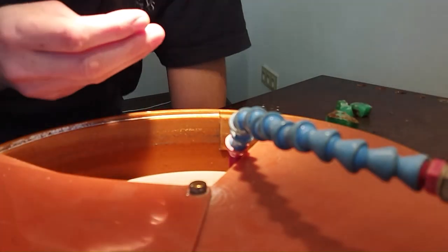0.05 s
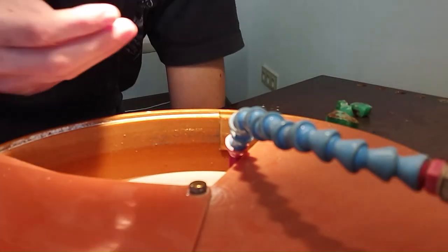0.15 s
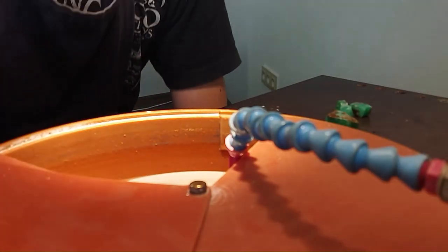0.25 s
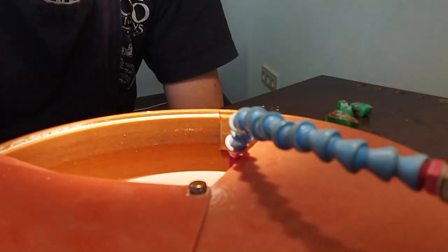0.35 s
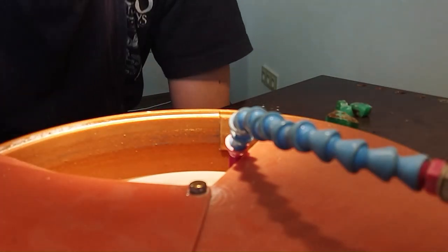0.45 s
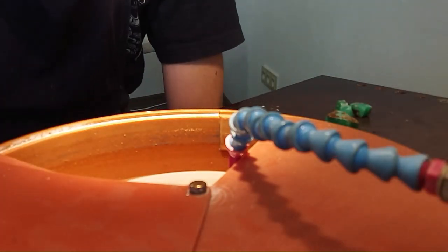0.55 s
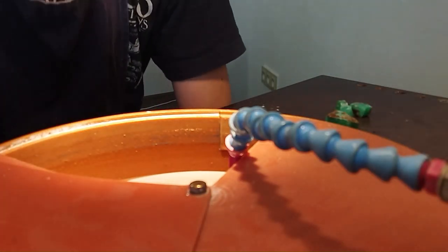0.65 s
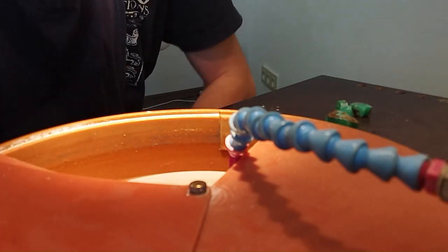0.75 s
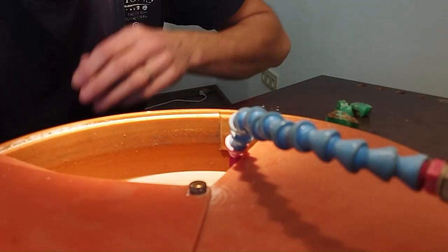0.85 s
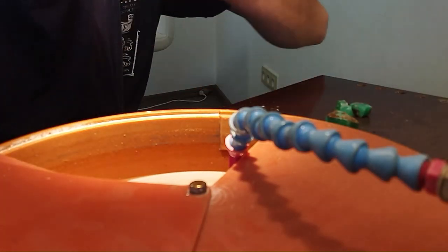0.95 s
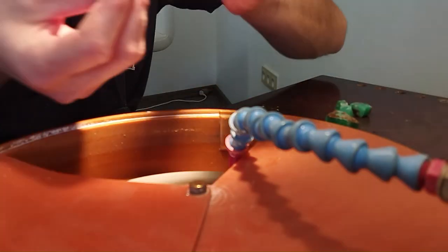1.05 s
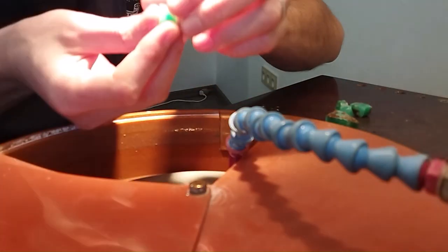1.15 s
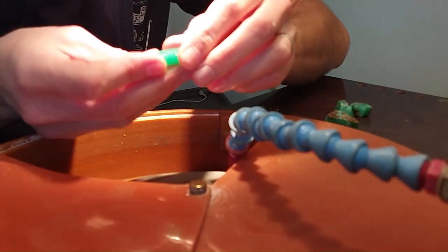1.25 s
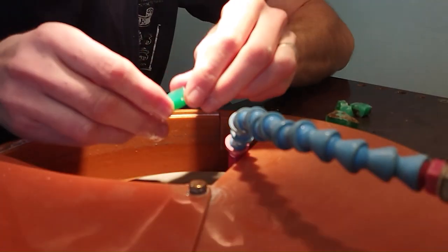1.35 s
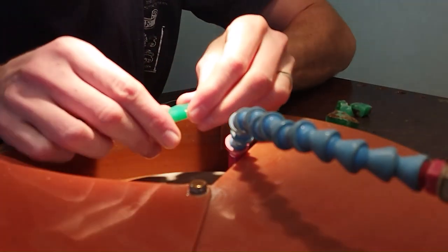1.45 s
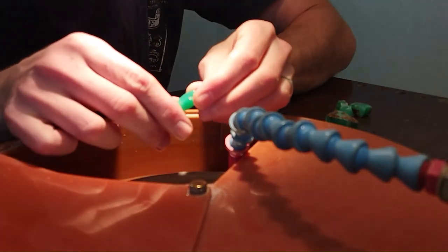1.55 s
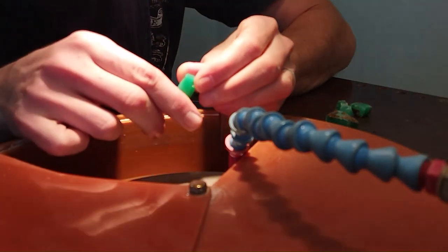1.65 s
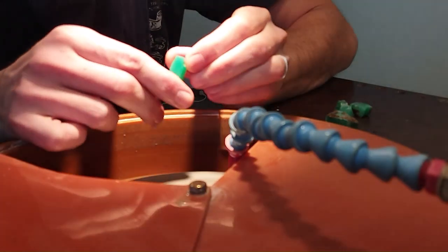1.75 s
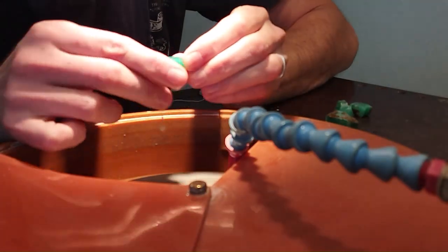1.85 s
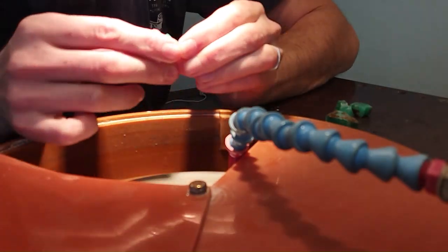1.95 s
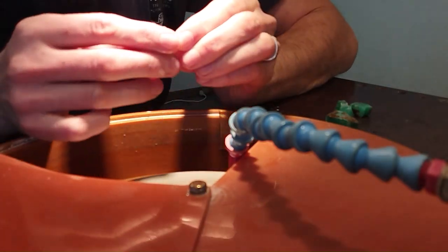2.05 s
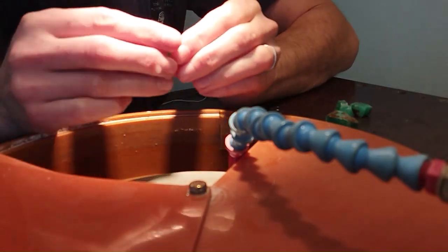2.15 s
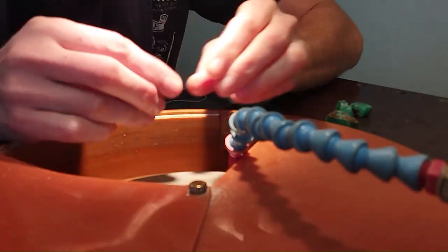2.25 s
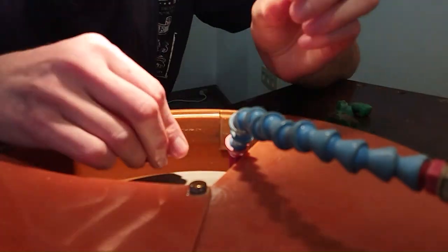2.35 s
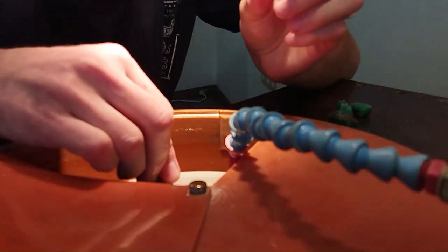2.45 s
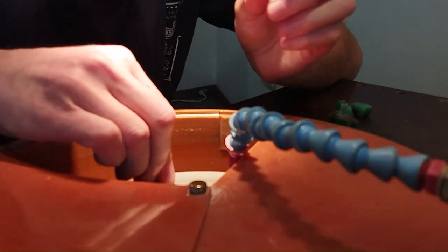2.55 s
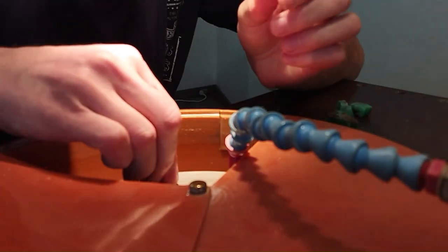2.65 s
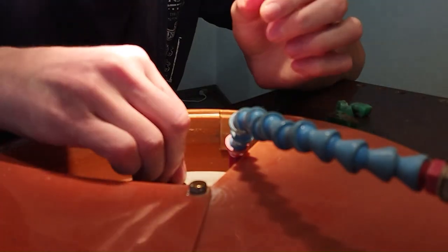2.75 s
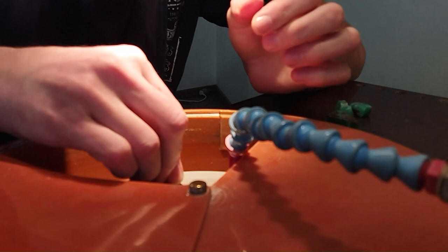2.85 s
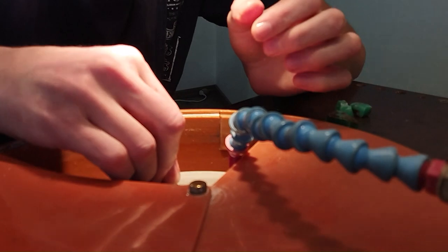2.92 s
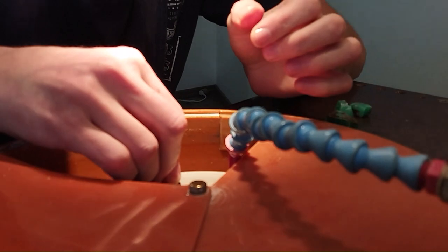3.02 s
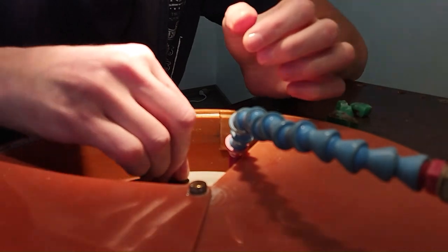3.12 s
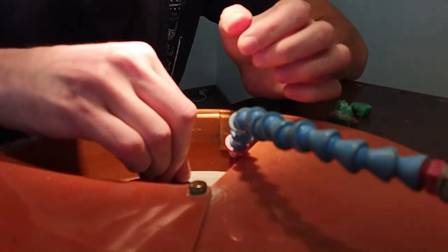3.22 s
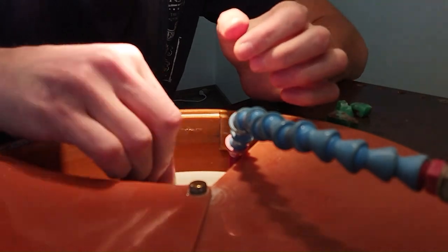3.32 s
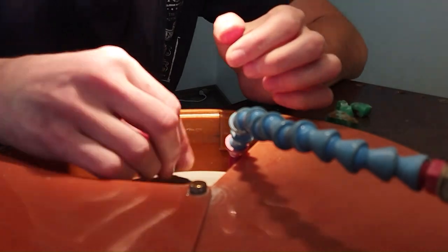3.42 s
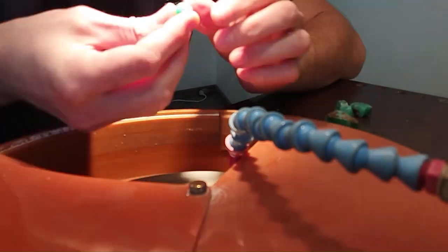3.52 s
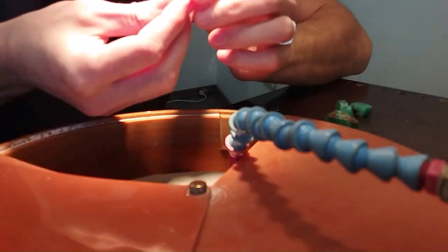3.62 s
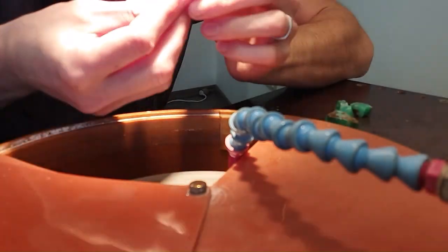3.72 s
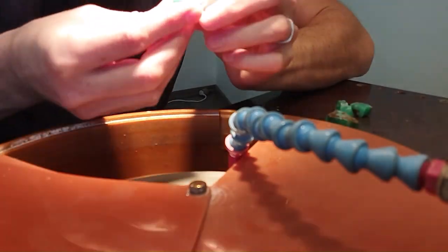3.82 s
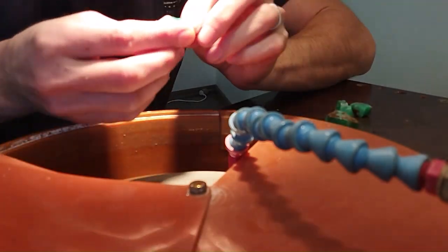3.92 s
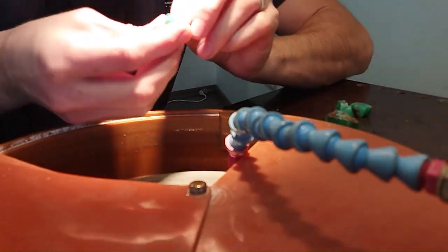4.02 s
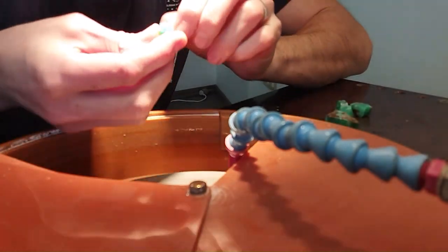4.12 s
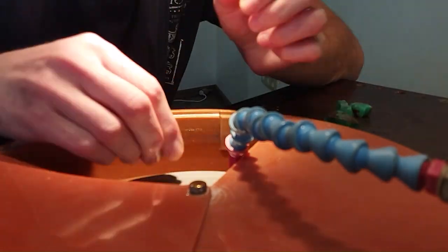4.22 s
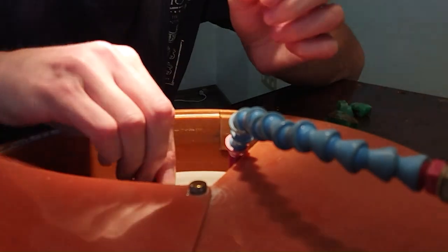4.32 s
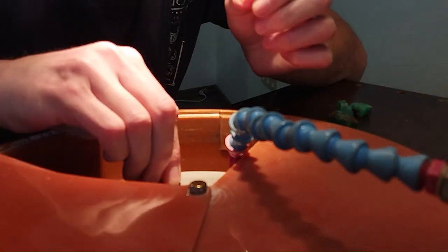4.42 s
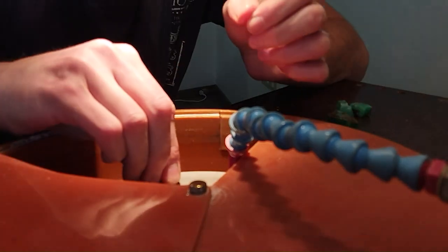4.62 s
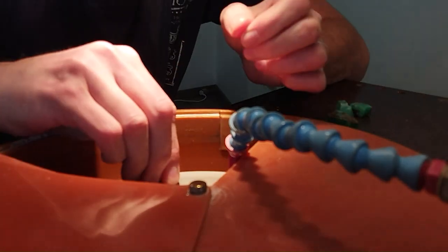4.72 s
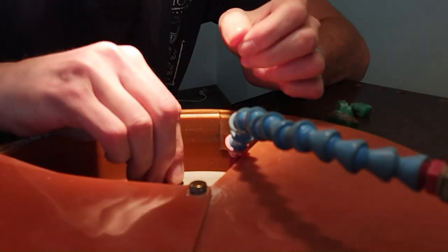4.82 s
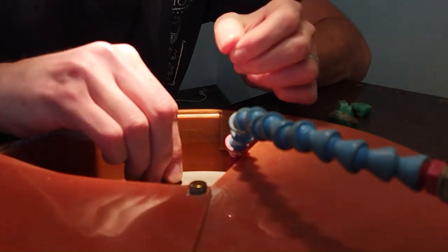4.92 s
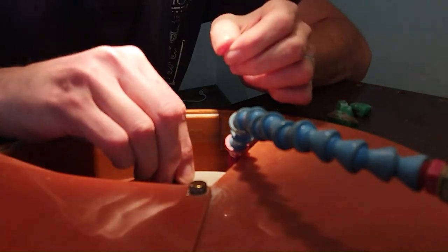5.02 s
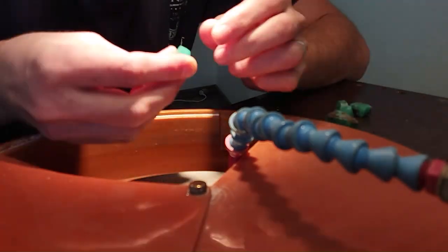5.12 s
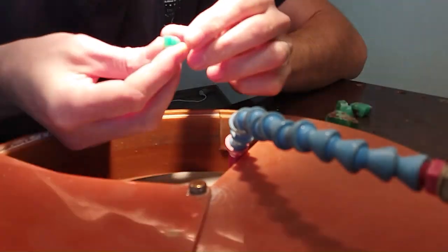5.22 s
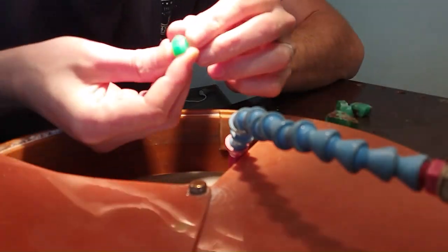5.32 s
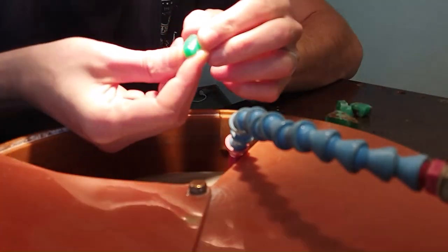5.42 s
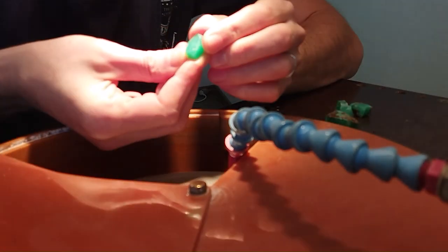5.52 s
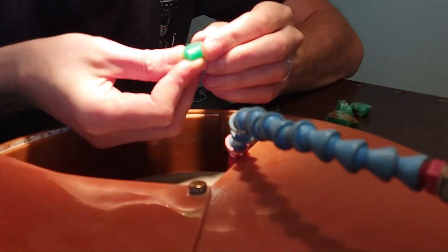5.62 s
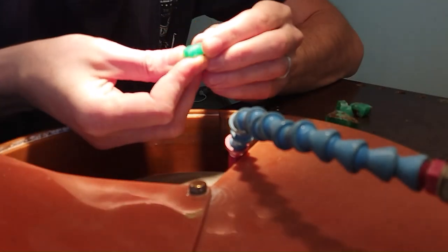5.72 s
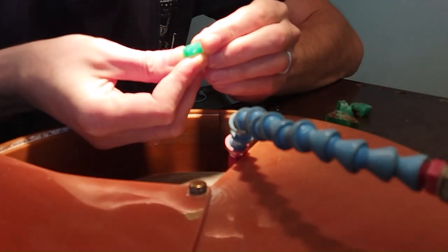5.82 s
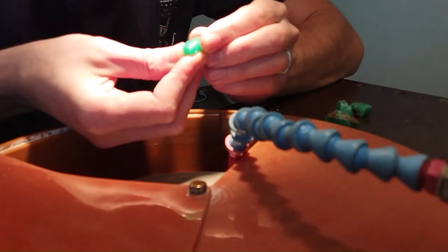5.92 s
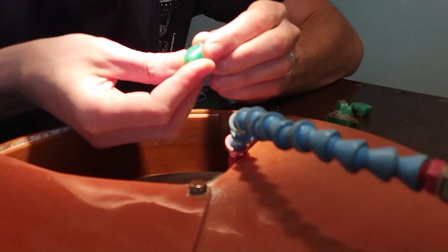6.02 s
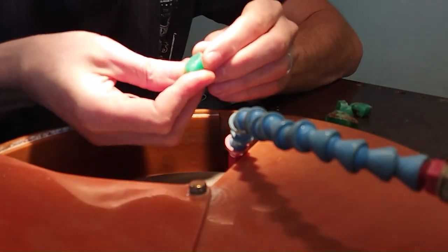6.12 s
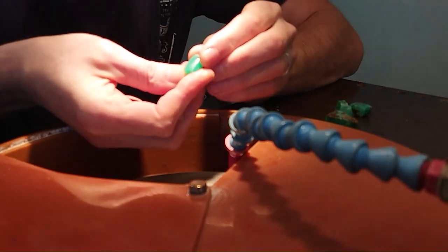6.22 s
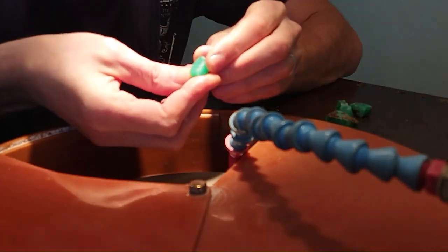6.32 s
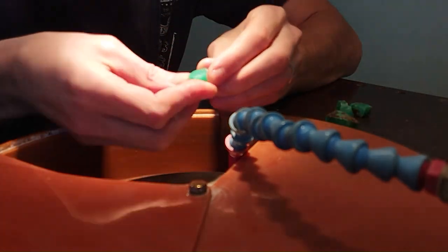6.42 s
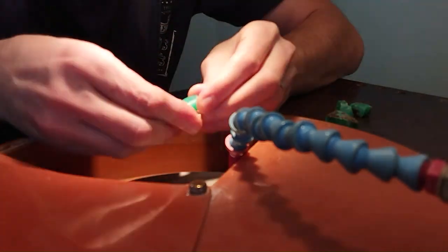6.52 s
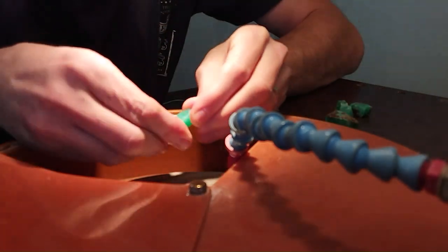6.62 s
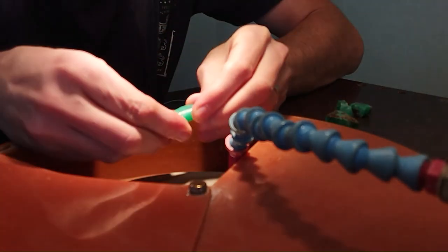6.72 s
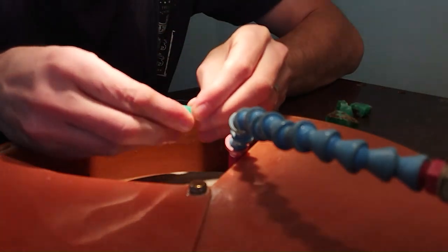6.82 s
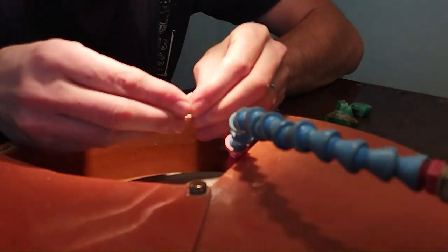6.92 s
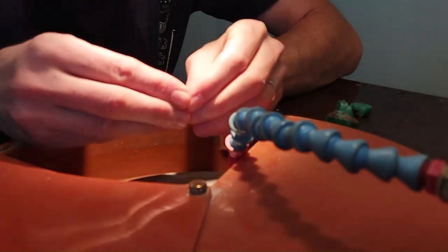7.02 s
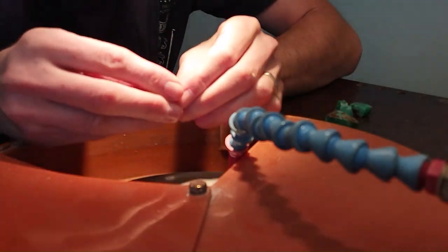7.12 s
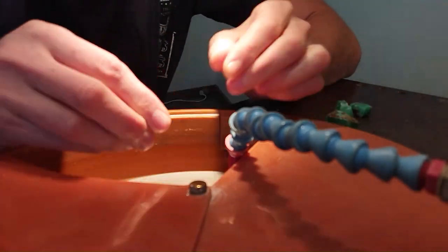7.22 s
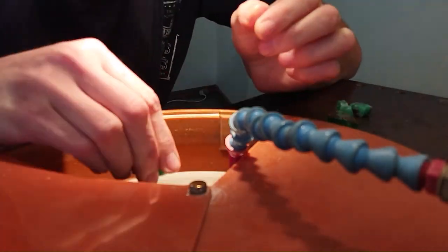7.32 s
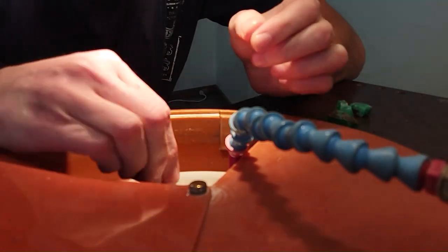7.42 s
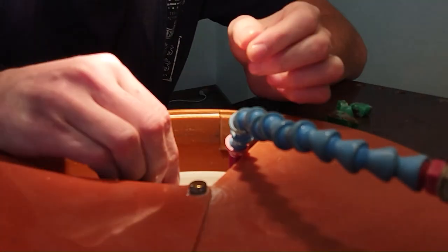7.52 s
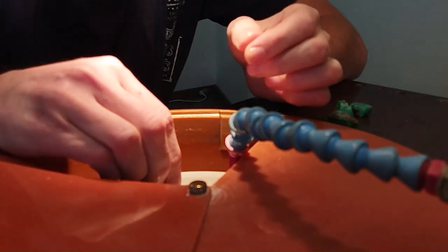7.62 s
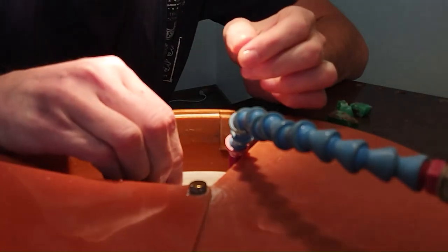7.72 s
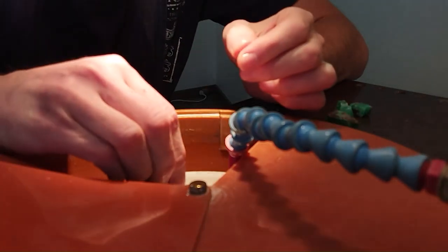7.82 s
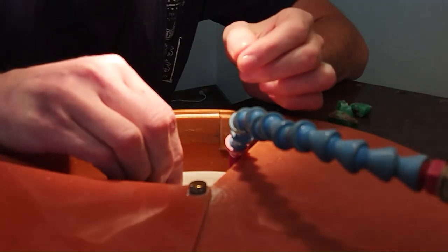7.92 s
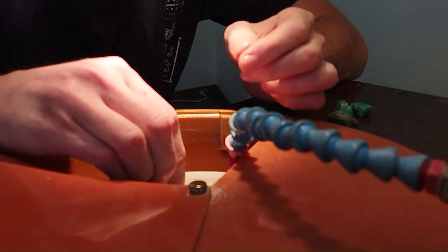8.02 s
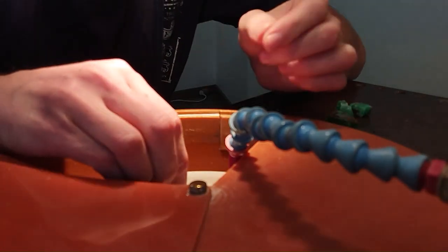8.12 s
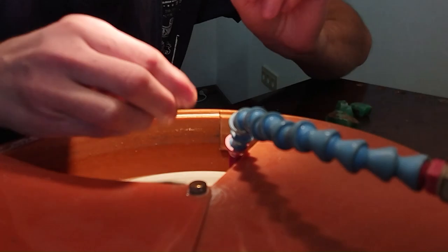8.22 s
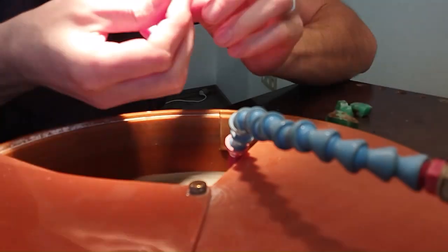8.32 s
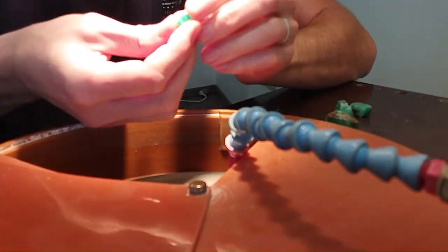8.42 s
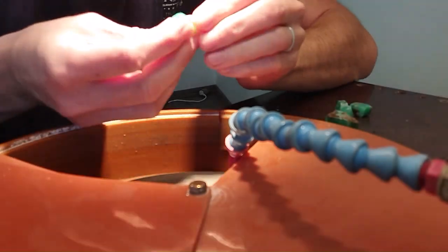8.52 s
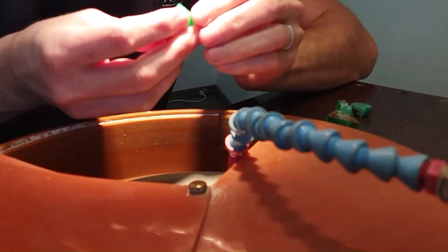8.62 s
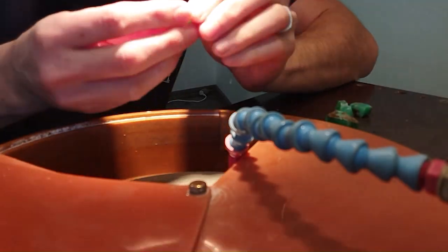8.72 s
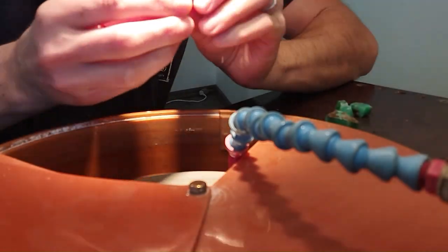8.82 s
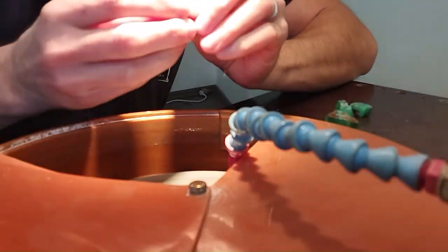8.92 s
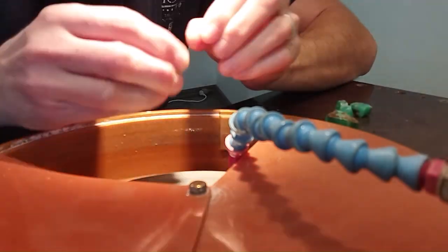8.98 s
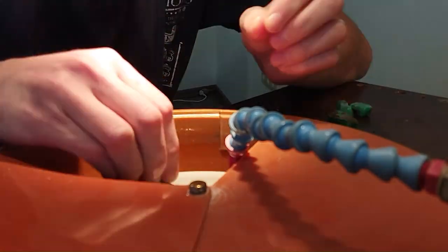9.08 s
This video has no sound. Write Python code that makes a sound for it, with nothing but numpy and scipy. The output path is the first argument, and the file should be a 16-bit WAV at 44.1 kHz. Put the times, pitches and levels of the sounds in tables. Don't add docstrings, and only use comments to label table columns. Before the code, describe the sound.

Steady motor hum, thin whine and water spray, one dull double knock, then three harsh gritty hisses as a stone meets a spinning disc.

```python
import sys
import numpy as np
from scipy import signal
from scipy.fft import rfft, irfft, next_fast_len
from scipy.io import wavfile
from scipy.ndimage import uniform_filter1d, map_coordinates

SR = 44100
rng = np.random.default_rng(int(sys.argv[2]) if len(sys.argv) > 2 else 0)


def persist_wave(psi):
    counts = np.round(np.clip(psi, -1, 1) * 32767).astype(np.int16)
    wavfile.write(sys.argv[1], SR, np.atleast_2d(counts).T)


def elevation(decibels):
    levels = np.asarray(decibels, float)
    return 10 ** (levels / 20)


N = 403515

HOP = 256
FRAMES = N // HOP + 5
HZ = np.fft.rfftfreq(4 * HOP, 1 / SR)
T, TF = np.arange(N) / SR, np.arange(FRAMES) * HOP / SR
SIDES = np.array([[.5], [-.5]])


def evened(x):
    return x / np.sqrt(np.mean(np.abs(x) ** 2) + 1e-20)


def read(points, hz):
    f, value = np.transpose(points)
    return np.interp(np.log(hz + 1), np.log(f + 1), value)


def columns(rows, t):
    s, *values = np.transpose(rows)
    return [np.interp(t, s, v) for v in values]


def humps(modes):
    return sum(db / (1 + (2 * (HZ - hz) / w) ** 2) for hz, w, db in modes)


def drift(t, top_hz):
    rates = np.geomspace(.3, top_hz, num=24)
    coarse = np.arange(0, N / SR + .02, .005)
    phases = 2 * np.pi * (np.outer(coarse, rates) + rng.random(len(rates)))
    waves = np.sin(phases) / rates ** 0.36
    return np.interp(t, coarse, evened(waves.sum(axis=1)))


def pair(same):
    a, b = rng.standard_normal((2, N))
    same = np.clip(same, -1, 1)
    return np.array([a, same * a + np.sqrt(1 - same ** 2) * b])


def resonate(x, hz, width):
    turn = np.exp(2j * np.pi * np.cumsum(hz * np.ones(N)) / SR)
    r = np.exp(-np.pi * width / SR)
    return 2 * (turn * signal.lfilter([1 - r], [1, -r], x * turn.conj())).real


def hiss(colour_db, same, lean, patchy_db, flicker_db, turn=0):
    a, b, c, d, patches = rng.standard_normal((FRAMES, len(HZ), 5)).T
    patches = uniform_filter1d(patches, size=8, axis=0)
    patches = evened(uniform_filter1d(patches, size=10, axis=1))
    flicker = evened(uniform_filter1d(rng.standard_normal(FRAMES), size=2))
    alike = np.clip(read(same, HZ), -1, 1)[:, None]
    left = a + 1j * b
    right = alike * left * np.exp(1j * turn) + np.sqrt(1 - alike ** 2) * (c + 1j * d)
    z = np.array([left, right])
    z *= elevation(SIDES * read(lean, HZ))[:, :, None]
    z *= elevation(colour_db + patchy_db * patches + flicker_db * flicker)
    return evened(signal.istft(z, nperseg=4 * HOP, noverlap=3 * HOP)[1][:, :N])


# [f/Hz, level/dB per Hz]
WASH_COLOUR = [(35, -86), (60, -63), (188, -39), (221, -28), (261, -14.5), (416, -21), (837, -10),
               (1190, -12), (1650, -2), (2180, -13), (2810, -3.5), (4280, -10), (4810, -8.5), (5530, -8.5),
               (15800, -21)]
# [f/Hz, width/Hz, level/dB]
PAN_DIPS = [(446, 71, -2.5), (1080, 280, -4), (4355, 190, -7.5), (5710, 290, -12.5), (6540, 470, -6),
            (8840, 410, -4), (11280, 700, -3.5), (14700, 1200, -3), (15440, 1200, 5.5)]
# [f/Hz, likeness -1 to 1]
SPRAY_SAME = [(100, 0.8), (290, 0.72), (900, -0.025), (1500, 0.21), (2200, 0.3), (3200, -0.69),
              (4500, -0.097), (15000, 0.083)]
# [f/Hz, left over right level/dB]
SPRAY_LEAN = [(60, 4), (180, 5.5), (550, 0), (1650, -2), (4970, 0), (15000, 3)]


def spray(speed, drone_db):
    spray_db = 0.7 * drift(TF, top_hz=5.5)
    treble = np.clip(np.log2(HZ / 2500 + .01), 0, 1)[:, None]
    colour_db = (read(WASH_COLOUR, HZ) + humps(PAN_DIPS))[:, None]
    colour_db = colour_db + treble * spray_db + (1 - treble) * 0.31 * drone_db
    shaft_hz = 32.6
    turn = 2 * np.pi * np.cumsum(shaft_hz * speed) / SR
    throb = 1 + 0.12 * np.cos(turn) + 0.069 * np.cos(2 * turn + 0.94)
    return elevation(-32.5) * hiss(colour_db, SPRAY_SAME, SPRAY_LEAN, patchy_db=.7, flicker_db=.35) * throb


# [f/Hz, width/Hz, level/dB]
MOTOR_TONES = [(198.8, 4.3, -65.5), (265.2, 8.3, -58), (317.8, 15, -57.5), (663, 8.3, -57), (816, 10, -53),
               (882, 5, -57), (918, 8.3, -62), (1286, 46, -75), (1425, 10, -70.5), (1462, 6.7, -45.5),
               (1497, 18, -46.5), (1612, 7.3, -45.5), (1620, 12, -49), (1770, 5.3, -55.5),
               (2550, 11, -59.5), (2746, 12, -50), (3037, 7.8, -53), (3115, 26, -49.5), (3616, 25, -50.5)]


def fuzzy_tones(speed):
    size = next_fast_len(N + SR // 2)
    f = np.fft.rfftfreq(size, 1 / SR)
    power = sum(elevation(2 * db) * w * SR / (4 * np.pi) / ((f - hz) ** 2 + w ** 2 / 4) for hz, w, db in MOTOR_TONES)
    steady = irfft(rfft(pair(same=0.86), size) * np.sqrt(power * size / N), size)
    return np.array([map_coordinates(ear, [np.cumsum(speed)], order=3) for ear in steady])


def whine(whine_hz):
    peak_hz, width_hz, lift_db = 4708, 45, 11
    whine_db = -60 + lift_db / (1 + (2 * (whine_hz - peak_hz) / width_hz) ** 2)
    waver_hz = 3.0 * evened(uniform_filter1d(rng.standard_normal(N), size=3000))
    phase = 2 * np.pi * np.cumsum(whine_hz + waver_hz) / SR + np.array([[0], [1.2]])
    sideband_hz = 182
    lines = np.cos(phase) + elevation(-6) * np.cos(phase + 2 * np.pi * sideband_hz * T)
    return elevation(whine_db + 9.0) * lines


# [t/s, f/Hz]
WHINE_PITCH = [(0, 4772), (2.4, 4778), (3.6, 4782), (4.3, 4758), (5.2, 4712), (6.7, 4705), (6.78, 4686),
               (7.1, 4673), (7.45, 4686), (8.3, 4682), (8.55, 4660), (8.75, 4680), (8.88, 4710),
               (9.15, 4704)]


def motor():
    whine_hz, = columns(WHINE_PITCH, T)
    speed = whine_hz / 4706
    rise_db_per_s, swell_db = 0.15, 2.26
    drone_db = rise_db_per_s * (TF - TF.mean()) + swell_db * drift(TF, top_hz=9)
    drone = fuzzy_tones(speed) * elevation(np.interp(T, TF, drone_db)) * elevation([[-1.2], [1.2]])
    return spray(speed, drone_db) + drone + whine(whine_hz)


# [f/Hz, level/dB, t60/s]
BENCH_MODES = [(125, -13.5, 0.22), (256, -10, 0.19), (337, -13, 0.13), (385, -5, 0.11), (541, -4.5, 0.19),
               (619, -3, 0.15), (685, 4.5, 0.078), (880, -9, 0.088), (1050, -5, 0.038)]
# [t/s, peak level/dB, pitch factor]
KNOCKS = [
    (.621, -22.5, 1),
    (.648, -26, .91),
    (.712, -32, .85),
]


def knocks():
    out, t = np.zeros(N), np.arange(SR // 2) / SR
    for s, db, pitch in KNOCKS:
        ring = sum(elevation(d - 60 * t / t60) * np.sin(2 * np.pi * hz * pitch * t) for hz, d, t60 in BENCH_MODES)
        ring *= 1 - np.exp(-t / 0.0086)
        out[round(s * SR):][:len(t)] += elevation(db) * ring / np.abs(ring).max()
    return np.array([out, out])


LIFT_DB_PER_S = 190


def stroke(t, touch, lift):
    bite_s, settle_s = 0.00054, 0.036
    since = t - touch
    contact = np.clip(since / bite_s, 0, 1)
    fresh = np.exp(-np.maximum(since, 0) / settle_s)
    return contact, fresh, np.maximum(t - lift, 0)


# [pan ring at touch level/dB, pan ring held level/dB, judder level/dB, judder left over right level/dB]
SHAKE = [
    (-6.5, -17, -29.5, 10),
    (-1, -17, -32, 5.5),
    (-9.5, -13.5, -42.5, 0),
]


def judder():
    lumps = elevation(2.6 * evened(uniform_filter1d(rng.standard_normal((2, N)), size=2500)))
    low = resonate(pair(same=0.12), 130, 170)
    high = resonate(pair(same=0.09), 420, 250)
    rumble = evened(low + 1.2 * high) * evened(lumps)
    held = 0
    for (touch, lift, db, _, _), (_, _, shake_db, lean_db) in zip(PRESSES, SHAKE):
        contact, _, gone = stroke(T, touch, lift)
        held = held + contact * elevation(db + shake_db - LIFT_DB_PER_S * gone + SIDES * lean_db)
    return rumble * held


# [f/Hz, width/Hz, level/dB]
PAN_MODES = [(1537, 130, 1), (1634, 110, 0), (1706, 330, -5)]


def pan_ring():
    shake = pair(same=0.66)
    ring = evened(sum(elevation(db) * resonate(resonate(shake, hz, w), hz, 2 * w) for hz, w, db in PAN_MODES))
    peal = 0
    for (touch, lift, db, _, _), (struck_db, held_db, _, _) in zip(PRESSES, SHAKE):
        contact, _, gone = stroke(T, touch, lift)
        struck = np.exp(-np.maximum(T - touch, 0) / 0.12)
        level = contact * elevation(db - LIFT_DB_PER_S * gone)
        peal = peal + level * (elevation(held_db) + elevation(struck_db) * struck)
    return peal * ring * elevation([[-1.8], [1.8]])


# [f/Hz, level/dB per Hz]
GRIT_COLOUR = [(1060, -61), (1800, -18), (2400, -11.5), (3100, -8.5), (3900, -4.5), (5000, -2), (6200, -2),
               (8000, -5), (10500, -2.5), (12400, -4.5), (14000, -6), (15800, -12)]
# [f/Hz, width/Hz, level/dB]
DISC_MODES = [(2130, 150, -5), (2700, 100, -10), (2880, 100, -5), (3520, 170, -9), (4010, 300, 2),
              (4600, 190, -15), (5180, 600, 5), (5750, 220, -10), (7090, 300, 2), (8230, 300, 2),
              (8750, 200, -7), (9800, 300, -6), (12100, 600, 2), (14700, 400, -4)]
# [f/Hz, likeness -1 to 1]
GRIT_SAME = [(1500, 0.37), (2500, 0.26), (3400, 0.55), (5500, 0.49), (7000, 0.44), (8000, 0.11),
             (15000, 0.069)]
# [f/Hz, left over right level/dB]
GRIT_LEAN = [(1800, -3.5), (4400, -2.5), (8000, 1.5), (15000, 5)]
# [f/Hz, phase/rad]
GRIT_TURN = [(1500, -1.5), (2300, -1), (3000, -2), (5000, -2), (7000, -2.5)]


def scratches(wander_db):
    which = np.maximum(np.searchsorted([row[0] - .1 for row in PRESSES], TF) - 1, 0)
    touch, lift, _, fizz_db, _ = np.transpose(PRESSES)[:, which]
    _, fresh, gone = stroke(TF, touch, lift)
    fizz_db = fizz_db - SETTLE_DB * fresh - 58.5 * np.minimum(gone, .5)
    fizz_db = fizz_db - wander_db + .9 * drift(TF, top_hz=8)
    top = np.clip((HZ - 8000) / 2000, 0, 1)[:, None]
    fizz = hiss(top * fizz_db, GRIT_SAME, GRIT_LEAN, patchy_db=1.6, flicker_db=.8,
                turn=read(GRIT_TURN, HZ)[:, None])
    bites = np.minimum(rng.exponential(1, N // 16 + 1), 3.5)
    grains = elevation(2.32 * uniform_filter1d(np.repeat(bites, 16)[:N], size=24))
    disc = signal.firwin2(4 * HOP + 1, HZ, elevation(read(GRIT_COLOUR, HZ) + humps(DISC_MODES)), fs=SR)
    return evened(signal.oaconvolve(fizz * grains, disc[None], "same"))


SETTLE_DB = -2.5
# [touch t/s, lift t/s, pressure level/dB, top fizz re hiss level/dB, left over right level/dB]
PRESSES = [
    (2.577, 3.486, -21.5, 1, 1.3),
    (4.356, 5.099, -21, 1.5, 0.5),
    (7.4718, 8.192, -18.5, -2, 0.06),
]


def grinding():
    wander_db = .5 * drift(TF, top_hz=10)
    sway_db = .9 * drift(T, top_hz=9)
    push = 0
    for touch, lift, db, _, lean_db in PRESSES:
        contact, fresh, gone = stroke(T, touch, lift)
        level = contact * elevation(db - LIFT_DB_PER_S * gone)
        push = push + level * elevation(SETTLE_DB * fresh + SIDES * (lean_db + sway_db))
    return elevation(8.5 + np.interp(T, TF, wander_db)) * scratches(wander_db) * push + pan_ring()


# [f/Hz, t60/s]
ROOM_T60 = [(300, 0.67), (2000, 0.41), (8000, 0.13), (15000, 0.079)]


def room(x):
    taps = np.zeros((2, SR // 2))
    at = np.arange(200, SR // 2 - 20, 20) + rng.integers(0, 20, (2, (SR // 2 - 201) // 20))
    np.put_along_axis(taps, at, rng.choice([-1., 1.], at.shape), 1)
    hz, t, z = signal.stft(taps, SR, nperseg=256)
    tail = signal.istft(z * elevation(-60 * t / read(ROOM_T60, hz)[:, None]), SR, nperseg=256)[1]
    return signal.fftconvolve(x, tail / np.linalg.norm(tail[0]), axes=1)[:, :N]


def scene():
    stone, bench = grinding(), knocks()
    return motor() + stone + bench + judder() + room(elevation(-6.5) * stone + elevation(-11) * bench)


# [f/Hz, level/dB]
ROUNDING_STEP = [(100, -20), (300, -14), (700, -9.5), (1300, -7), (2000, -1.5), (3500, 3), (5000, 5),
                 (8000, 5), (11000, 5), (14000, 5), (15000, 2), (15500, -2)]


def spectral_squeeze(x, size=1024):
    offset = 220
    n, k = np.arange(2 * size), np.arange(size)
    basis = np.cos(np.pi / size * np.outer(n + (1 + size) / 2, k + .5)) * np.sqrt(2 / size)
    basis *= np.sin(np.pi * (n + .5) / (2 * size))[:, None]
    count = N // size + 3
    blocks = np.pad(x, ((0, 0), (size + offset, count * size - N - offset))).reshape(2, -1, size)
    lines = np.concatenate([blocks[:, :-1], blocks[:, 1:]], axis=2) @ basis
    level_db = 10 * np.log10((lines ** 2).mean(axis=2, keepdims=True) + 1e-12)
    uneven = evened(uniform_filter1d(rng.standard_normal((count, size // 4)), size=3, axis=0))
    uneven_db = 4 * np.repeat(uneven, 4, axis=1)
    step_db = level_db + .33 * (level_db + 18) + uneven_db
    step = elevation(step_db + read(ROUNDING_STEP, k * SR / (2 * size)))
    block_db = 10 * np.log10((blocks ** 2).mean(axis=(0, 2)) + 1e-12)
    jump = np.diff(block_db) > 4
    step[:, jump | np.roll(jump, 1)] *= .1
    rounded = np.sign(lines) * np.floor(abs(lines) / step + .4) * step
    back = rounded @ basis.T
    return (back[:, 1:, :size] + back[:, :-1, size:]).reshape(2, -1)[:, offset:offset + N]


def roll_off(x):
    return signal.sosfilt(signal.butter(12, 17000, fs=SR, output="sos"), x)


def record(dry):
    power_db = 10 * np.log10(abs(uniform_filter1d((dry ** 2).mean(0), size=2000)) + 1e-12)
    gain_cut = elevation(.15 * np.maximum(power_db + 30, 0))
    x = .8 * np.tanh(dry / gain_cut / .8)
    x = signal.sosfilt(signal.butter(4, 150, "highpass", fs=SR, output="sos"), x)
    edge = signal.firwin(511, 15900, window=("kaiser", 7), fs=SR)
    mix = spectral_squeeze(signal.oaconvolve(x, edge[None], "same"))
    return roll_off(mix)


dry = scene()
out = record(dry)
persist_wave(out)
```